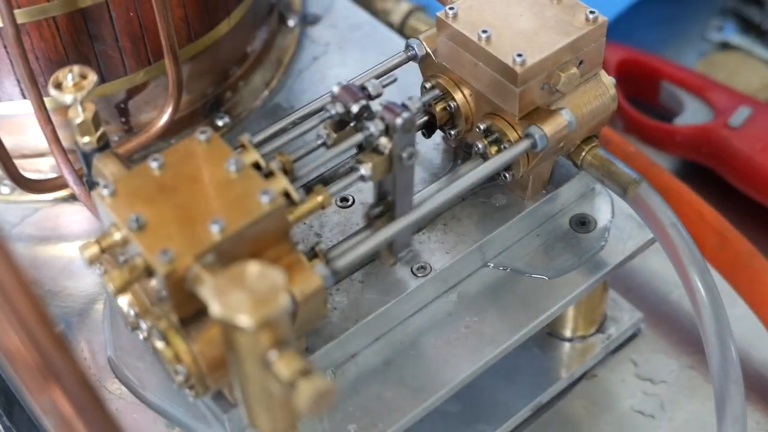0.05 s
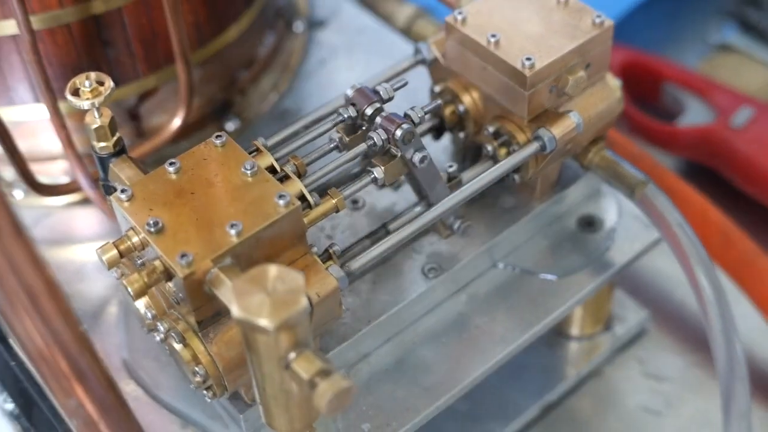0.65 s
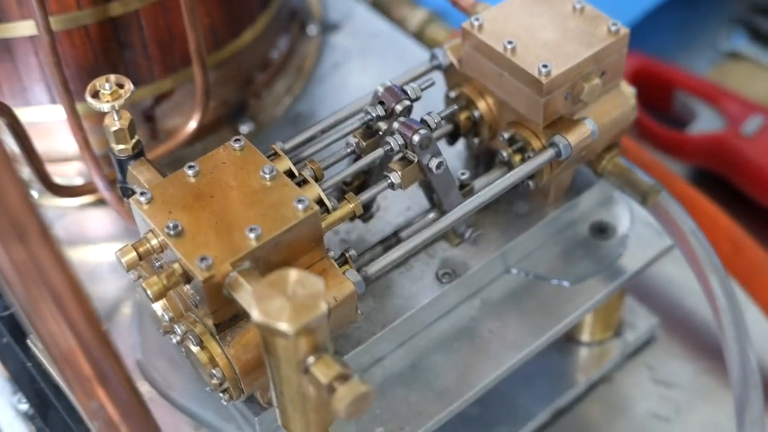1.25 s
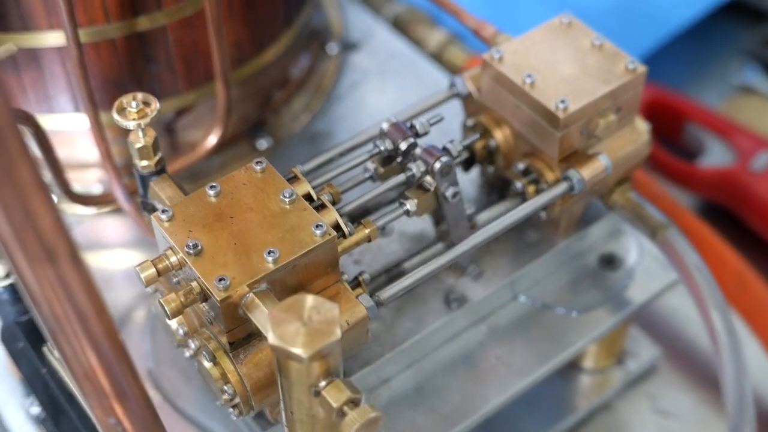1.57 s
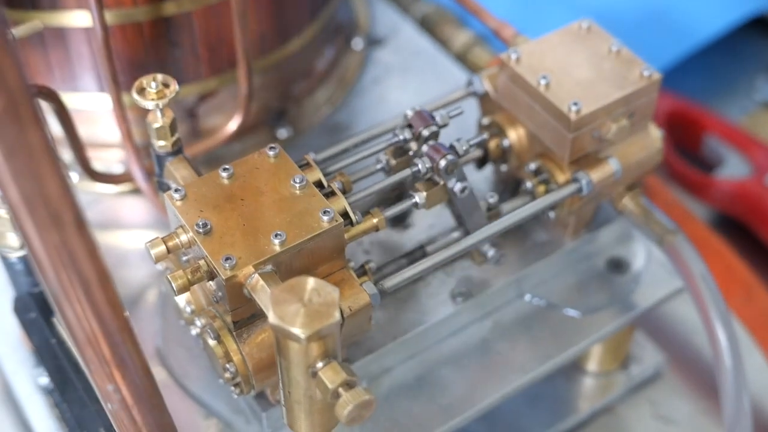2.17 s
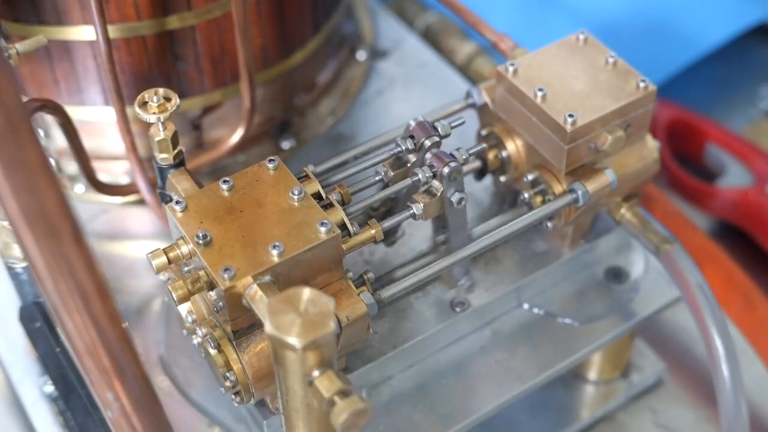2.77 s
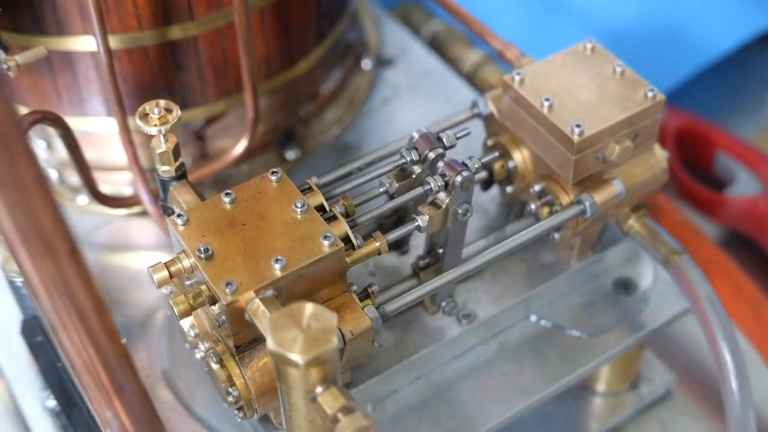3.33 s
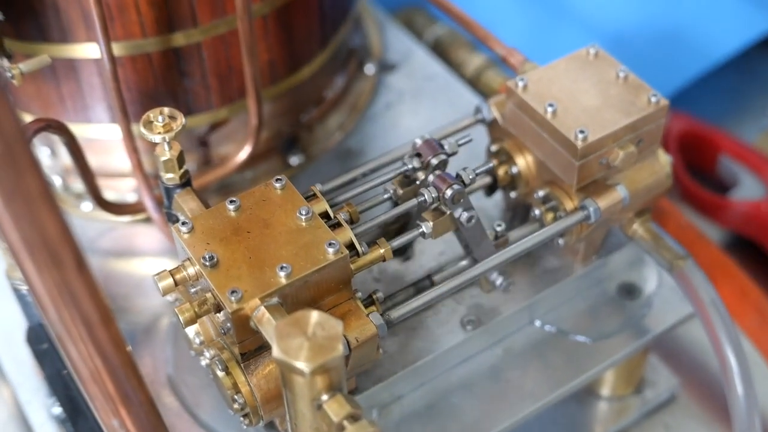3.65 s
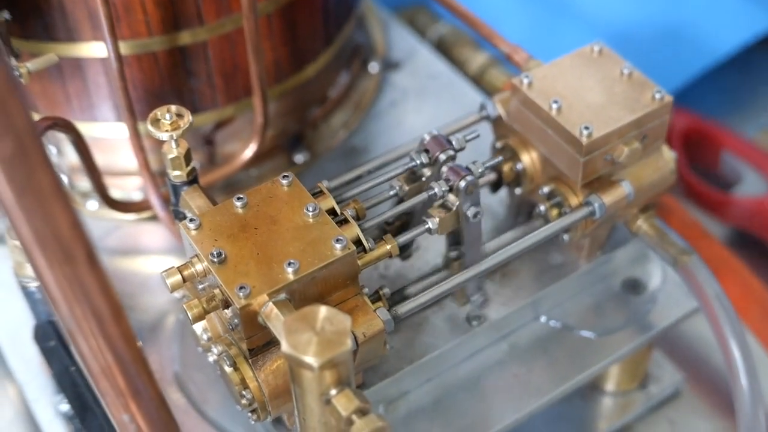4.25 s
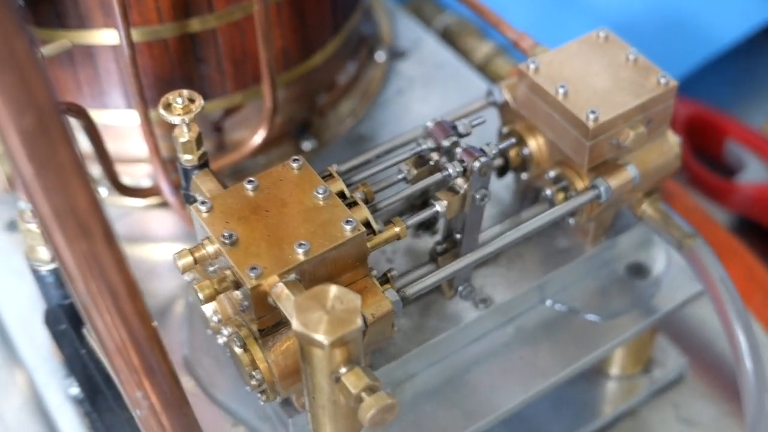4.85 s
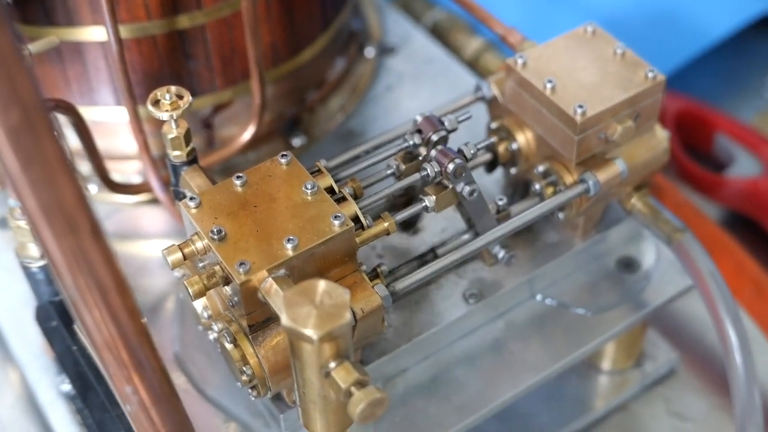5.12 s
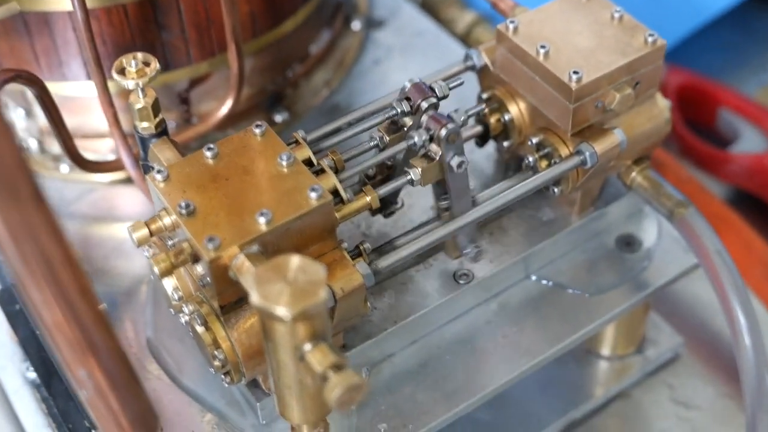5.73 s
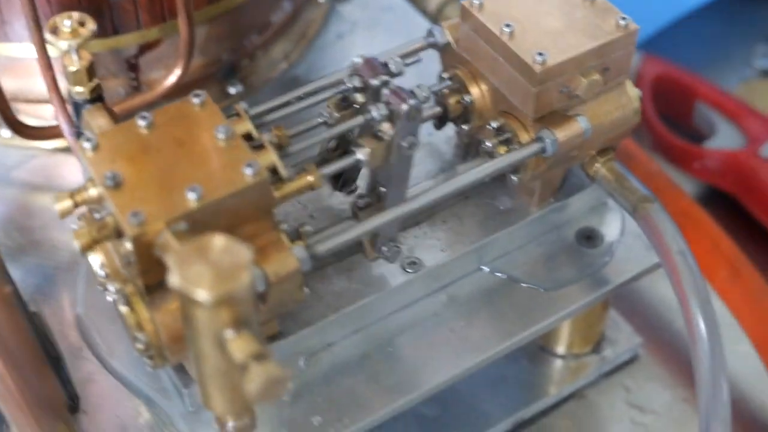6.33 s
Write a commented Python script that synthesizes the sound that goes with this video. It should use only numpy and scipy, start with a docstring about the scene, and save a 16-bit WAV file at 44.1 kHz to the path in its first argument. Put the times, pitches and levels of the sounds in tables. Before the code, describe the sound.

Quick, even chuffs of wet steam sputter from a model pump, with light knocks and a boiler burner roaring steadily underneath.

```python
"""A model duplex steam pump runs close by on a workbench: two pistons, four strokes a cycle.
Each stroke lets out a puff of wet steam that hisses at the port and sputters down the exhaust pipe.
Slugs of condensate spit in the pipe, and the valve gear knocks lightly on the frame.
Under it all the boiler's burner roars in its flue, over faint workshop air."""
import sys
import numpy as np
from scipy import signal
from scipy.fft import rfft, irfft, next_fast_len
from scipy.io import wavfile
from scipy.ndimage import uniform_filter1d, map_coordinates

SR = 44100
rng = np.random.default_rng(int(sys.argv[2]) if len(sys.argv) > 2 else 0)


def dump_mix(stems):
    """Bounce the given channels to the path in sys.argv[1] as a 16-bit WAV at rate SR."""
    frames = np.atleast_2d(stems).T  # one column per channel
    limited = np.clip(frames, -1, 1)  # hard clip at full scale
    pcm = np.round(limited * 32767).astype(np.int16)
    wavfile.write(sys.argv[1], SR, pcm)


N = 290619
TIME_S = np.arange(N) / SR


def amp(db):
    """Decibels to gain."""
    return 10 ** (np.asarray(db) / 20)


def unit_rms(x):
    """Scale to rms 1."""
    return x / np.sqrt(np.mean(x ** 2) + 1e-20)


def along(points, hz):
    """Interpolate (freq_hz, value) rows on a log axis."""
    freqs, values = np.transpose(points)
    return np.interp(np.log(hz + 1), np.log(freqs + 1), values)


def wobble(knots_per_s):
    """Smooth random curve."""
    knots = rng.standard_normal(int(N * knots_per_s / SR) + 4)
    return map_coordinates(knots, [TIME_S * knots_per_s])


def filtered(x, response):
    """Apply a frequency response."""
    size = next_fast_len(N + SR // 2)
    return irfft(rfft(x, size) * response(np.fft.rfftfreq(size, 1 / SR)), size)[..., :N]


def equalised(x, curve):
    """Apply a (freq_hz, gain_db) curve."""
    return filtered(x, lambda hz: amp(along(curve, hz)))


def ring(modes, size=8192):
    """Minimum-phase impulse response, energy 1, of steep-sided resonances."""
    hz = np.fft.rfftfreq(size, 1 / SR) + 1
    power = sum(amp(2 * db) / (1 + ((hz ** 2 - centre ** 2) / (hz * width)) ** 2) ** 2
                for centre, width, db in modes)
    cepstrum = irfft(np.log(power + 1e-12) / 2)
    cepstrum[1:size // 2] *= 2
    cepstrum[size // 2 + 1:] = 0
    response = irfft(np.exp(rfft(cepstrum)))
    return response / np.linalg.norm(response)


def through(x, response):
    """Convolve with an impulse response."""
    return signal.fftconvolve(x, response)[:N]


def droplets(rate_per_s, scatter_db):
    """Random impulses of uneven size, rms 1."""
    sizes = amp(scatter_db * np.clip(rng.standard_normal(N), -2, 2)) * rng.choice([-1, 1], N)
    return unit_rms(sizes * (rng.random(N) < rate_per_s / SR))


def blows(events, response):
    """One copy of the response per (start_s, peak_db) row."""
    train = np.zeros(N)
    for start_s, peak_db in events:
        train[int(np.clip(round(start_s * SR), 0, N - 1))] += amp(peak_db)
    return through(train, response / np.abs(response).max())


FIRST_CYCLE_S, CYCLE_S, SLOWING_S_PER_CYCLE, CYCLE_COUNT = -.0213, .4777, .0019, 14


def cycle_times(phase):
    """Seconds at which the slowing pump passes one phase of its cycle."""
    turns = np.arange(CYCLE_COUNT) + phase
    return FIRST_CYCLE_S + CYCLE_S * turns + SLOWING_S_PER_CYCLE * turns ** 2 / 2


def puffs(start_s, level_db, rise_s, hold_s, fall_db_per_s):
    """Flow at one port: it slides open, holds, and the cylinder pressure runs out."""
    coarse_s = np.arange(0, N + 64, 64) / SR
    age_s = coarse_s - start_s[:, None]
    opening = (1 + np.tanh(age_s / rise_s)) / 2
    pressure = amp(level_db[:, None] - fall_db_per_s * np.maximum(age_s - hold_s, 0))
    return np.interp(TIME_S, coarse_s, np.linalg.norm(opening * pressure, axis=0))


# Steam jet resonances: centre_hz, width_hz, gain_db
JET_MODES = [(4860, 1800, -20), (7323, 565, -6.5), (7720, 300, -2), (8134, 210, 1), (8580, 360, -2),
             (9110, 450, -3), (9720, 1260, -5), (11230, 1400, -7), (11900, 710, -4.5), (12440, 490, 0.5),
             (12950, 530, -7), (13583.0, 796.0, -7), (14217.0, 2100, -8.5)]
# Hiss per port: relative_db, rise_s, hold_s, fall_db_per_s, edge_db
PORT_HISS = [(-28.5, 0.0063, 0.032, 161, 1.5), (-25, 0.0082, .0058, 182, -2), (-23.5, .024, 0.015, 151, 0),
             (-24, .022, .0026, 131, .5)]
# Hiss colour, one curve per port: freq_hz, gain_db
PORT_TONES = [
    [(5000, -0.5), (7500, -1), (9500, 1.2), (11000, -3), (12400, 2), (13800, -4.5), (15300, -1)],
    [(5000, 0.5), (7500, -0.5), (8300, .5), (11800, 2.9), (13300, 0.5), (15000, -1)],
    [(5000, -3), (7500, -2), (10400, 0.5), (12200, -1.6), (14000, 0.5), (15500, -6)],
    [(5000, 2), (7000, 0.5), (8500, 2), (9900, -1.5), (12000, 2), (13000, 2), (14400, -4)],
]


def hiss(port, start_s, steam_db):
    """One port's jet; its sharp edge fades first as the pressure drops."""
    relative_db, *shape, edge_db = PORT_HISS[port]
    flow = puffs(start_s, relative_db + steam_db, *shape)
    spray = unit_rms(rng.standard_normal(N) + amp(-10) * droplets(rate_per_s=1100, scatter_db=-1.0))
    jet = equalised(through(flow * spray, ring(JET_MODES)), PORT_TONES[port])
    body = filtered(jet, lambda hz: 1 / (1 + (hz / 9500) ** 20))
    edge = jet - body
    pressure_db = 20 * np.log10(flow / flow.max() + .01)
    return (body * amp(-.11 * pressure_db - edge_db / 2 - 1.15)
            + edge * amp(.17 * pressure_db + edge_db / 2 + .47))


# Exhaust pipe resonances: centre_hz, width_hz, gain_db
PIPE_MODES = [(920, 490, -18), (1548, 150, -11.5), (2054, 740, -4.5), (2317, 460, 0.0), (2720, 430, -2),
              (3062, 280, 0), (3380, 254, -5), (3630, 240, -14), (4292, 140, -16.5), (4580, 990, -23.5),
              (5830, 1900, -27)]


def sputter(water_flow):
    """Water carried by the steam bursts in the pipe."""
    gurgle = unit_rms(droplets(rate_per_s=1100, scatter_db=2.5) + amp(3.5) * rng.standard_normal(N))
    return amp(-.5) * through(water_flow * gurgle, ring(PIPE_MODES))


# Port openings: phase_cycles
PORT_PHASES = [0, .23, .505, .748]
# Water flow per port: relative_db, rise_s, hold_s, fall_db_per_s
PORT_WATER = [(-28, 0.016, 0.029, 110), (-27, 0.014, 0.031, 131), (-25, 0.031, .001, 61),
              (-23.5, .012, .001, 109)]
# Steam supply drift: time_s, pressure_db, wetness_db
STEAM_SUPPLY = [(0, 0, -.5), (1.4, -0.07, 1.3), (2.2, 0, .8), (3.2, 0.3, -0.85), (4.2, -0.05, -0.5),
                (5.0, -0.64, 0.9), (6.5, 1.1, -1.5)]


def exhaust(scatter_db=(.47, .5)):
    """Four ports vent wet steam in turn, no two strokes alike."""
    time_s, pressure_db, wetness_db = np.transpose(STEAM_SUPPLY)
    jets, water_flow = np.zeros(N), np.zeros(N)
    for port, phase in enumerate(PORT_PHASES):
        start_s = cycle_times(phase)
        steam_error_db, water_error_db = (rng.normal(0, db, CYCLE_COUNT) for db in scatter_db)
        steam_db = np.interp(start_s, time_s, pressure_db) + steam_error_db
        water_db = np.interp(start_s, time_s, pressure_db + wetness_db) + water_error_db
        jets += hiss(port, start_s, steam_db)
        relative_db, *shape = PORT_WATER[port]
        water_flow = np.hypot(water_flow, puffs(start_s, relative_db + water_db, *shape))
    choke = wobble(90)  # water in the pipe makes the flow flutter
    pipe = sputter(water_flow * amp(.68 * choke))
    return pipe + jets * amp(-.48 + .5 * choke + .4 * wobble(300))


# Boiler flue resonances: centre_hz, width_hz, gain_db
FLUE_MODES = [(148, 72, -11.5), (214.6, 41.5, -8), (332, 85.4, -1.1), (364, 69, 1.5), (521.6, 40, -6.5),
              (563, 67, -7), (686, 104, -14.5), (995, 480, -24.5)]
# Diffuse share of the roar: freq_hz, side_minus_mid_db
ROAR_WIDTH = [(30, -3), (70, -15), (140, -20), (350, -29), (550, -16.5), (1000, -9)]
# Roar balance: freq_hz, left_minus_right_db
ROAR_BALANCE = [(60, -3), (140, -3.5), (350, -1.7), (550, 2), (1000, 2)]
# Roar phase, boiler to the left: freq_hz, left_lead_rad
ROAR_LEAD = [(0, 0), (340, 0.75), (1290, 0.35), (2070, 0.0), (15300, -0.0)]
# Brief swells of the roar: centre_s, gain_db
ROAR_SWELLS = [(.35, 2), (1.03, 4.5), (1.65, 3.5), (2.0, 3), (2.39, 4), (4.86, 3.5), (5.23, 3), (5.6, 3)]
FLAME_DB, FLICKER_DB, FLICKER_PER_S, SWELL_HALF_WIDTH_S = -32, .44, 9, .019


def burner(notch_hz=472, notch_half_width_hz=12, notch_db=-8):
    """The turbulent flame drives the flue's resonances; an echo cancels a narrow band between them."""
    def notch_and_bearing(hz):
        notch = amp(notch_db * np.exp(-((hz - notch_hz) / notch_half_width_hz) ** 2))
        sides = np.array([[.5], [-.5]])
        return notch * amp(sides * along(ROAR_BALANCE, hz)) * np.exp(1j * sides * along(ROAR_LEAD, hz))

    flue = ring(FLUE_MODES)
    mid = through(rng.standard_normal(N), flue)
    side = equalised(through(rng.standard_normal(N), flue), ROAR_WIDTH)
    roar = filtered(np.array([mid + side, mid - side]), notch_and_bearing)
    running_rms = np.sqrt(np.abs(uniform_filter1d(np.mean(roar ** 2, axis=0), size=SR // 6)))
    swell_db = sum(db * np.exp(-((TIME_S - centre_s) / SWELL_HALF_WIDTH_S) ** 2)
                   for centre_s, db in ROAR_SWELLS)
    return roar / running_rms * amp(FLAME_DB + swell_db + FLICKER_DB * wobble(FLICKER_PER_S))


# Workshop air spectrum: freq_hz, relative_db
AIR_SPECTRUM = [(20, -8), (50, -10), (80, 9), (300, 5.5), (1500, 1), (6000, -5), (15000, -27)]


def workshop_air(level_db=-50):
    """Faint air noise, partly alike on both sides."""
    noise = rng.standard_normal((2, N)) + amp(-8) * rng.standard_normal(N)
    return amp(level_db) * unit_rms(equalised(noise, AIR_SPECTRUM))


# Loudest spits of condensate: start_s, relative_db
LOUD_SPITS = [(0.0154, -13.5), (0.4944, -13), (0.6835, -14), (1.6153, -14), (2.7344, -13), (3.1288, -12),
              (4.4772, -14), (5.1814, -12), (5.2829, -9), (6.1843, -9.5)]
# Regular slugs, as port two opens and late in stroke three: phase_cycles
SLUG_PHASES = [.24, .672]
# Slug at each of those phases: relative_db, scatter_db, jitter_s
CYCLE_SLUGS = [(-17, 0, 0.0022), (-15.5, 3, .006)]
SMALL_SLUG_COUNT, SMALL_SLUG_RELATIVE_DB, SMALL_SLUG_SCATTER_DB = 8, -17.5, 1.5


def spits(burst_s=.0014):
    """Slugs of water break up in the pipe within milliseconds, with a little spray."""
    regular = [(rng.normal(start_s, jitter_s), db + scatter_db * rng.uniform(-1, 1))
               for phase, (db, scatter_db, jitter_s) in zip(SLUG_PHASES, CYCLE_SLUGS)
               for start_s in cycle_times(phase) if start_s < N / SR]
    small = [(rng.uniform(0, N / SR), rng.normal(SMALL_SLUG_RELATIVE_DB, SMALL_SLUG_SCATTER_DB))
             for _ in range(SMALL_SLUG_COUNT)]
    age_s = np.arange(SR // 20) / SR
    envelope = blows([*LOUD_SPITS, *regular, *small], age_s * np.exp(-age_s / burst_s))
    bursts = envelope * rng.standard_normal(N)
    return amp(-11.5) * through(bursts, ring(PIPE_MODES)) + amp(-26) * through(bursts, ring(JET_MODES))


# Pump frame resonances: centre_hz, width_hz, gain_db
FRAME_MODES = [(854, 220, 2), (980, 210, -3.5)]
# Valve gear meets its stops: phase_cycles
STOP_PHASES = [.101, .326, .792]
# Knock per stop: relative_db, scatter_db
STOP_KNOCKS = [(-36.5, 1.5), (-40.5, 1.5), (-35, 1)]
# Knock force drift: time_s, gain_db
KNOCK_FORCE = [(0, -1.5), (1.8, 1.5), (2.3, -1), (2.95, 3), (3.6, -0.5), (5.3, 0), (6.5, 0)]


def valve_gear():
    """Oily, damped knocks into the frame, three to a cycle."""
    time_s, force_db = np.transpose(KNOCK_FORCE)
    knocks = [(start_s, rng.normal(db, scatter_db) + np.interp(start_s, time_s, force_db))
              for phase, (db, scatter_db) in zip(STOP_PHASES, STOP_KNOCKS)
              for start_s in cycle_times(phase) if start_s < N / SR]
    return amp(3.5) * blows(knocks, ring(FRAME_MODES))


# Echoes off bed plate, boiler and bench: delay_s, gain_db
NEAR_ECHOES = [(.0021, -25), (.0046, -12), (.0083, -8.5)]
# Workshop reverberation: freq_hz, t60_s
ROOM_DECAY = [(200, .25), (2500, 0.1), (12000, 0.04)]
# Width of the pump's tail: freq_hz, side_minus_direct_db
TAIL_WIDTH = [(1700, -18.5), (2500, -53), (3100, -18.5), (4000, -13), (6000, -32), (7300, -15.5),
              (9300, -37), (10500, -36), (11800, -42), (13000, -18.5), (15000, -15)]


def workshop_echoes(x, mirror_hz=3500):
    """Small near surfaces echo the treble; the walls add a short, wide tail."""
    def near_surfaces(hz):
        reflected = hz / (hz + mirror_hz)  # longer waves bend round them
        return reflected * sum(amp(db) * np.exp(-2j * np.pi * hz * s) for s, db in NEAR_ECHOES)

    hz, age_s, noise = signal.stft(rng.standard_normal((2, SR // 3)), SR, nperseg=256)
    decay = amp(-60 * age_s / along(ROOM_DECAY, hz)[:, None])
    _, tails = signal.istft(noise * decay, SR, nperseg=256)
    tails = np.pad(tails, ((0, 0), (SR // 250, 0)))  # 4 ms predelay
    mid_tail, side_tail = (through(x, tail / np.linalg.norm(tail)) for tail in tails)
    mid = filtered(x, near_surfaces) + amp(-19.5) * mid_tail
    side = equalised(side_tail, TAIL_WIDTH)
    return np.array([mid + side, mid - side])


# Direct pump sound: freq_hz, left_minus_right_db
PUMP_BALANCE = [(1500, 1.5), (2700, -0.5), (3050, -2), (3700, -2.5), (4100, .8), (6000, 0), (12500, 0.2)]


def scene():
    """Pump in front, boiler beside it, room around."""
    pump = exhaust() + spits() + valve_gear()
    direct = filtered(pump, lambda hz: amp(np.outer([.5, -.5], along(PUMP_BALANCE, hz))))
    return direct + workshop_echoes(pump) + burner() + workshop_air()


BAND_LIMIT_HZ = 15720


def record(dry):
    """Brick-wall low-pass."""
    return filtered(dry, lambda hz: hz < BAND_LIMIT_HZ)


dry = scene()
out = record(dry)
dump_mix(out)
```